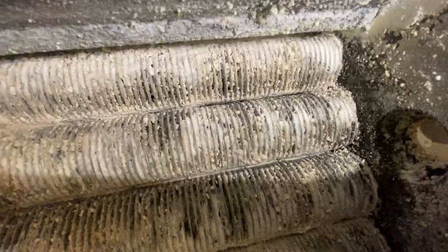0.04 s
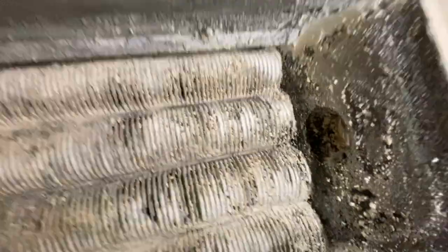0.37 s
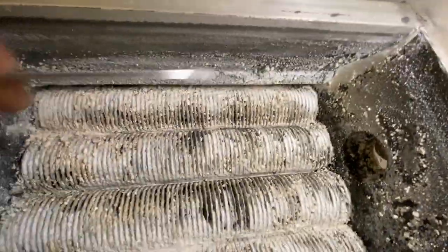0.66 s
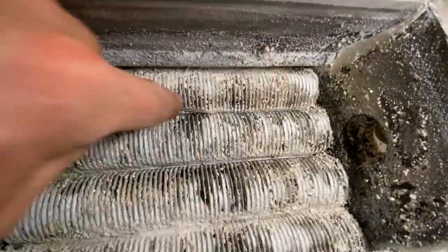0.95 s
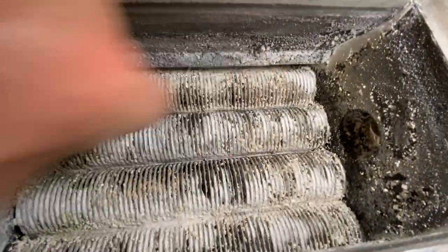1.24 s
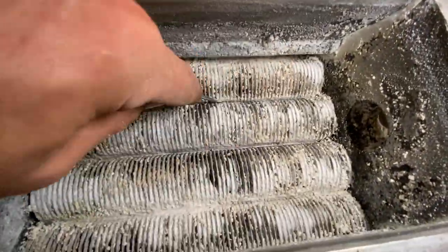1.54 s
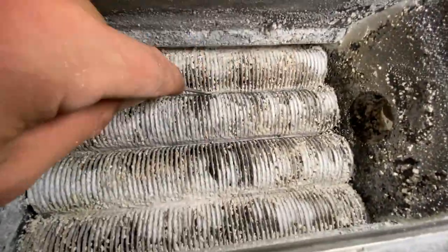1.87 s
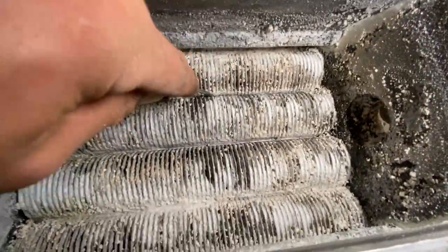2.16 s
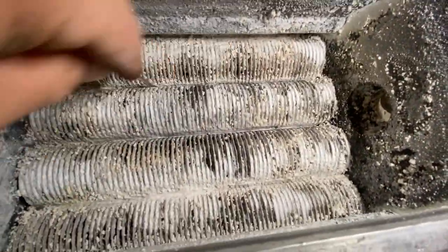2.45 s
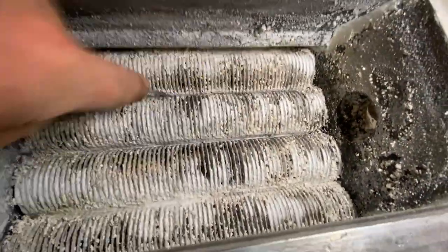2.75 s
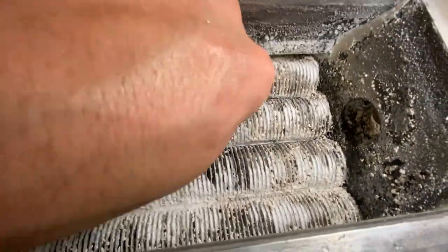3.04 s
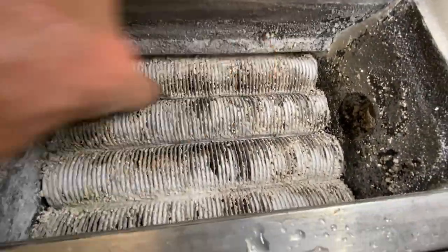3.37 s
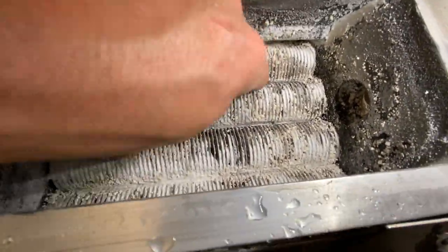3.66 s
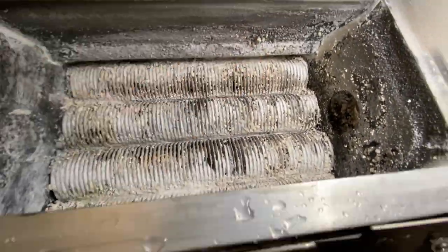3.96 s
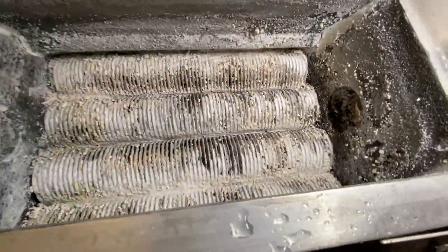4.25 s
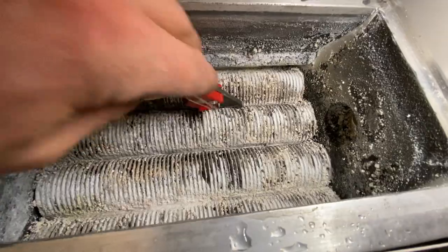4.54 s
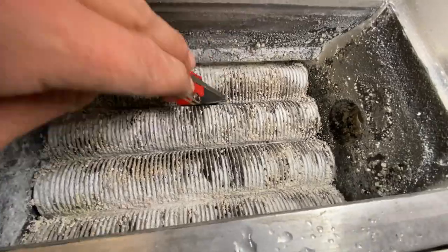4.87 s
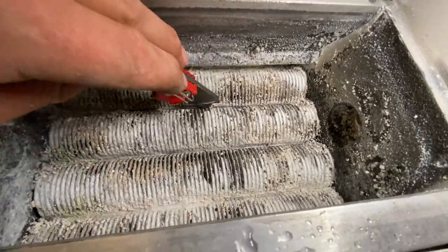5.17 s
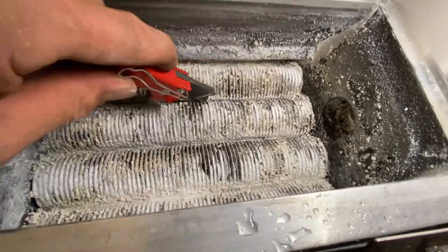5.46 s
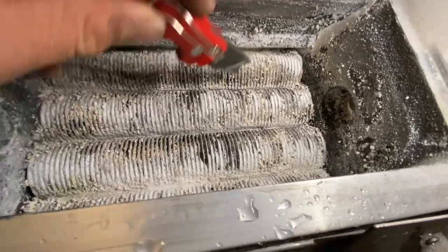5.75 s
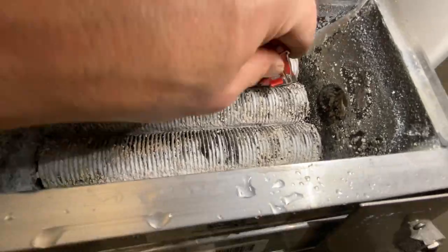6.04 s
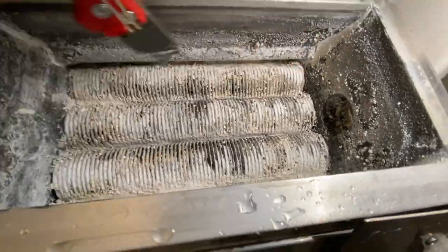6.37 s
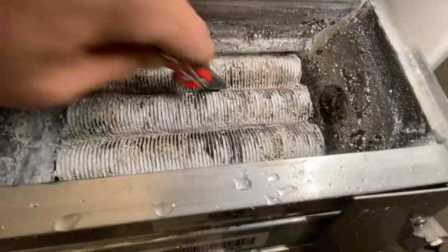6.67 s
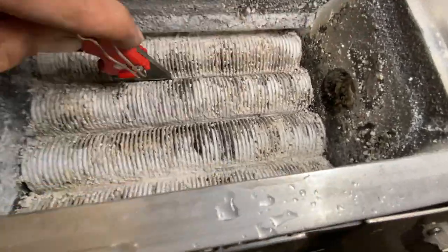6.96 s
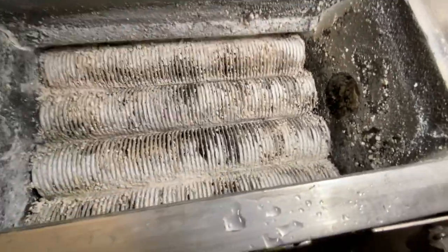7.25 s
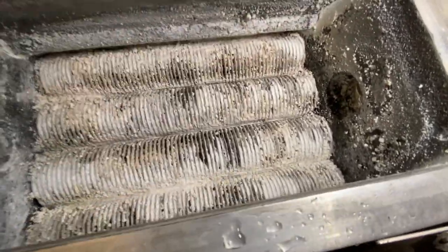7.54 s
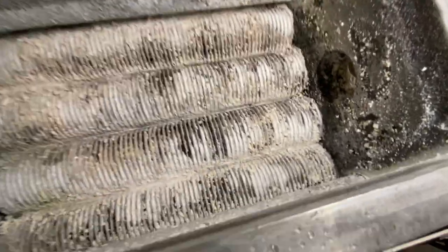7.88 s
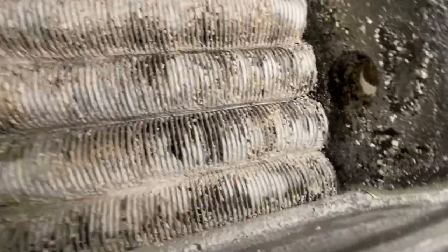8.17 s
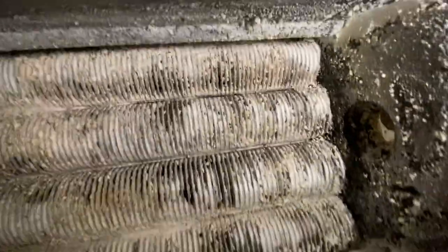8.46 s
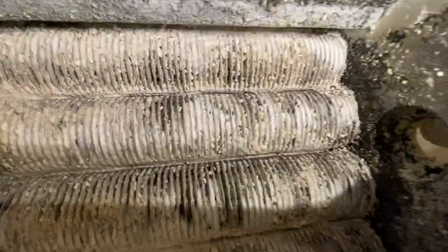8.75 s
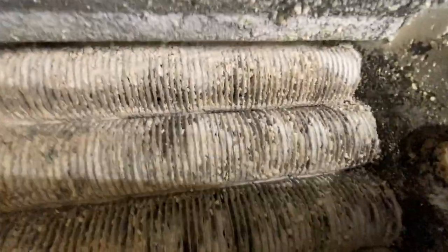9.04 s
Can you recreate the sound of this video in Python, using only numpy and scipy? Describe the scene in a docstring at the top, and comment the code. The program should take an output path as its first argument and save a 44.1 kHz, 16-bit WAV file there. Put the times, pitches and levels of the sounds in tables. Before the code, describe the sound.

A steel pin, then a knife, scrapes and snaps gritty crust from metal coils close up, followed by hollow knocks on the microphone.

```python
"""A boiler being descaled in a small room, heard close up on a hand-held stereo microphone.
First the grip rubs and creaks on the microphone case. From about 1 s a steel pin, then from 4 s a knife,
scrapes crust from between the coils: crushed grains ring in the tool and in the steel chamber, hard
crumbs snap and the coils thud. After 7 s the tool is put away, the hand knocks the case and metal
clinks lightly. A faint background hiss sinks after loud scraping and rises again in the pauses."""
import sys
import numpy as np
from scipy import signal
from scipy.fft import rfft, irfft, next_fast_len
from scipy.io import wavfile

SR = 44100
rng = np.random.default_rng(int(sys.argv[2]) if len(sys.argv) > 2 else 0)


def master_out(mix):
    """Clip the mix to full scale and print it as 16-bit PCM to the path in sys.argv[1]."""
    frames = np.transpose(np.atleast_2d(mix))
    ceiling = np.clip(frames, -1, 1)
    pcm = np.round(ceiling * 32767).astype(np.int16)
    wavfile.write(sys.argv[1], SR, pcm)


N = 401751
TIME = np.arange(N) / SR

# strokes of each tool: t/s, length/s, chamber level/dB, tip level/dB, slide-in/s
PIN_STROKES = [(.94, 0.12, -30, -39, 0.016), (1.142, 0.031, -41.5, -48.5, 0.013),
               (1.266, 0.052, -34, -34, 0.0067), (1.766, 0.041, -36, -42.5, 0.0018),
               (1.85, 0.052, -54, -56, 0.01), (2.293, 0.0076, -27, -35, 0.0086),
               (2.44, 0.066, -32, -41, 0.018), (2.594, 0.058, -26, -35, 0.009),
               (2.754, 0.048, -27, -32.5, 0.016), (3.093, 0.087, -28.5, -34, .002),
               (3.4, .044, -27.5, -32, 0.055), (3.598, 0.027, -43.5, -43.5, .004),
               (3.745, 0.073, -28.5, -39.5, 0.038), (3.84, 0.042, -32, -38, 0.0096)]
KNIFE_STROKES = [(4.617, 0.039, -35.5, -38, 0.017), (4.796, 0.15, -55.5, -63.5, 0.0066),
                 (6.106, 0.036, -33, -30.5, 0.024), (6.187, 0.013, -26.5, -42.5, 0.027),
                 (6.345, 0.03, -44, -55.5, 0.026), (6.62, 0.017, -37, -27, .006),
                 (6.693, .007, -31, -23, .005), (6.725, 0.015, -38.5, -57, 0.0094)]
# knocks on the microphone case: t/s, hollow level/dB, scuff level/dB, thump level/dB
CASE_KNOCKS = [(7.3395, -10, -23.5, -22.5), (7.556, -7, -22, -29.5), (7.593, -15.5, -43, -38),
               (7.659, -23, -27.5, -43.5), (7.697, -40, -18.5, -39), (7.803, -25, -46, -32.5)]
# handling noise at the microphone: t/s, rumble level/dB, rustle level/dB
HANDLING = [(0, -46, -55), (.4, -63, -61), (1.2, -51, -56), (1.55, -66.5, -63.5), (1.95, -60.5, -67.5),
            (2.3, -52, -55), (2.95, -59, -62.5), (3.3, -63, -58), (4.4, -66, -71), (4.8, -63, -62),
            (5.1, -61.5, -66), (5.6, -57.5, -63.5), (6.85, -61, -56.5), (7.1, -66.5, -65.5),
            (7.5, -44, -52), (7.95, -52, -50), (8.5, -62, -62.5), (9.11, -54.5, -81.5)]
# resonances that colour creaks and clinks: f/Hz, width/Hz, level/dB
CONTACT_MODES = [(547, 690, -3.5), (1208, 79, 6), (1486, 110, 3), (2154, 190, 4.5), (2870, 660, -1.5),
                 (4090, 730, -4), (5220, 150, 2), (7220, 400, -8), (8340, 810, -13.5), (11300, 680, -36.5)]


def scraping():
    """Crushed crust drives the steel chamber, heard by reflection, and the tool tip, heard directly."""
    # resonances of the chamber under each tool, and of the thin blade: f/Hz, width/Hz, level/dB
    pin_modes = [(190, 110, -6), (440, 180, -7), (821, 93, -2), (1265, 79, 0.5), (1574, 92, 1.5),
                 (1824, 36, 3), (2130, 296, -1.5), (2617, 290, -2.5), (2740, 170, 1.5), (3236, 200, -4.5),
                 (3630, 166, -2.5), (4450, 1600, -10.5), (5520, 270, -4), (6270, 700, -12.5),
                 (8040, 1900, -15.5)]
    knife_modes = [(190, 160, -4.5), (468, 360, 1), (824, 51, 8.5), (1268, 87, 12), (1583, 136, 7.5),
                   (1877, 130, 4.5), (2240, 220, 4), (3006, 500, 3.5), (3770, 280, 5), (4310, 790, -1.5),
                   (5050, 890, 2.5), (5940, 1600, -0.5), (8000, 880, -34)]
    blade_modes = [(4700, 450, -5), (5630, 400, -6.5), (6270, 550, -9.5)]
    # treble spectrum of each tip on the crust: f/Hz, level/dB
    pin_tip = [(8500, -7), (9800, -4), (11000, -1), (12500, 0), (14500, 0), (16000, -1)]
    knife_tip = [(8500, -3), (9200, -8.5), (10400, -6), (12000, -9.5), (13800, -9.5), (16000, -15)]
    # the tip catches on a rib or snaps a hard crumb: t/s, chamber level/dB, tip level/dB
    snags = [(.835, -41.5, -45), (1.04, -25, -21.5), (1.157, -30.5, -33.5), (1.272, -60, -30),
             (1.399, -42, -34.5), (1.877, -48, -40), (2.122, -30, -43), (2.464, -30.5, -20.5),
             (2.716, -40.5, -58), (3.048, -41.5, -40), (3.132, -27, -38), (3.17, -30, -32),
             (3.43, -25.5, -33), (3.603, -43.5, -33), (3.636, -68.5, -34), (4.15, -45, -45),
             (4.195, -44, -38.5), (4.48, -40, -51), (4.564, -48, -61), (4.724, -38, -38.5),
             (4.965, -46.5, -45), (5.011, -54, -48), (5.502, -53, -74), (5.62, -41, -42),
             (5.677, -28.5, -40), (5.737, -36.5, -48), (5.768, -37, -33.5), (6.066, -40.5, -36.5),
             (6.162, -29.5, -16), (6.571, -42, -48.5), (6.722, -26, -24.5), (6.836, -32.5, -59),
             (6.95, -40, -57), (7.023, -43, -39), (8.245, -48.5, -53)]
    pin_taken_s, knife_taken_s, knife_away_s = 0.8, 4.1, 7.05
    fracture = grains(per_s=16000, spread_db=1.5, clump_db=1, clumps_per_s=900)
    snaps = grains(per_s=64, spread_db=7, clump_db=13.5, clumps_per_s=40)
    # loose crumbs trickle as the hand moves, louder while a tool is at work
    crumbs = curve(HANDLING, column=2) * grains(per_s=380, spread_db=3.5, clump_db=10, clumps_per_s=22)
    crumbs *= from_db(np.where((TIME > pin_taken_s) & (TIME < knife_away_s), 0, -14))
    tools = [(PIN_STROKES, pin_modes, pin_tip, TIME <= knife_taken_s),
             (KNIFE_STROKES, knife_modes, knife_tip, TIME > knife_taken_s)]
    chamber, tip = 0, 0
    for strokes, modes, colour, held in tools:
        slide_in_s = np.array(strokes)[:, 4]
        crush = pressure(strokes, 2, slide_in_s, bite_db=-0.5, crest=0.46, ease_db=-6, release_s=0.027)
        crust = grains(per_s=9000, spread_db=1.5, clump_db=4.5, clumps_per_s=340)
        cracks = bites(strokes, column=2, gain_db=1) + held * from_db(4) * ticks(snags, column=1)
        drive = crush * (crust + from_db(-10) * snaps) + fracture * cracks
        drive += held * from_db(-1.5) * crumbs
        chamber += body(scatter(drive, fall_s=0.00082, wet_db=5.5), modes, sway_db=4.5)

        crumble = pressure(strokes, 3, slide_in_s, bite_db=-3.5, crest=0.62, ease_db=-2, release_s=0.023)
        grit = from_db(2) * grains(per_s=2900, spread_db=-7.5, clump_db=3.5, clumps_per_s=310)
        cracks = bites(strokes, column=3, gain_db=9) + held * from_db(-3) * ticks(snags, column=2)
        tip_drive = crumble * (grit + from_db(-14.5) * snaps) + fracture * cracks
        tip_drive += held * from_db(-12) * crumbs
        tip += tip_pings(tip_drive, colour, width_hz=340)
        if strokes is KNIFE_STROKES:  # the blade sings as it snicks through
            chamber += from_db(-7.5) * body(scatter(tip_drive, fall_s=0.0006, wet_db=24), blade_modes)
    return chamber + reflect(at_ports(tip), t60=0.02, wet_db=-13, cut_hz=17000)


def pressure(strokes, column, attack_s, bite_db, crest, ease_db, release_s):
    """A stroke slides in, bites, peaks at the fraction `crest` of its length, eases and lets go."""
    power = np.zeros(N)
    for row, lead in zip(strokes, np.broadcast_to(attack_s, len(strokes))):
        start, end = row[0], row[0] + row[1]
        corners_s = [start - lead, start, start + crest * (end - start), end, end + release_s]
        span = slice(max(0, int(corners_s[0] * SR)), int(corners_s[-1] * SR))
        shape_db = np.interp(TIME[span], corners_s, [-25, bite_db, 3, ease_db, -30])
        power[span] += from_db(row[column] + shape_db) ** 2
    return np.sqrt(power)


def grains(per_s, spread_db, clump_db, clumps_per_s):
    """Random fractures of uneven size, clumped as the edge sticks and slips."""
    size_db = spread_db * np.minimum(rng.exponential(1, N), 4)
    size_db += clump_db * np.tanh(drift(clumps_per_s))
    return rms_one(from_db(size_db) * rng.choice([-1, 1], N) * (rng.random(N) < per_s / SR))


def bites(strokes, column, gain_db):
    """Envelope of the crack as the edge digs in at the start of each stroke."""
    return from_db(gain_db) * bursts(strokes, column, fall_s=0.0035)


def ticks(rows, column, rise_s=0.0032):
    """Envelope of the ticks: the tip loads quickly, then the crumb gives way."""
    backwards = clicks(rows, column)[::-1]
    loading = signal.lfilter([0, 1], [1, -np.exp(-1 / (rise_s * SR))], backwards)[::-1]
    return loading + bursts(rows, column, fall_s=0.005)


def tip_pings(drive, colour, width_hz):
    """Each fracture pings at a treble pitch of its own; the favoured pitches change as the tip moves."""
    pitches = np.geomspace(colour[0][0], colour[-1][0], num=9)
    gains = rms_one(from_db(at_hz(colour, pitches)))
    chosen = np.repeat(rng.integers(0, len(pitches), N // 24 + 1), 24)[:N]  # one pitch per 24 samples
    pings = 0
    for k, (hz, gain) in enumerate(zip(pitches, gains)):
        sway = from_db(4 * np.tanh(drift(45)) - 1.5)
        pings += gain * sway * resonate(drive * (chosen == k), hz, width_hz)
    return pings / np.sqrt(np.pi * width_hz / SR)


def scatter(drive, fall_s, wet_db, left_lag_s=0.00045):
    """Each impulse scatters briefly; its direct sound reaches the nearer, right-hand port first."""
    decay = np.exp(-1 / (fall_s * SR))
    echo_power = signal.lfilter([1 - decay], [1, -decay], drive ** 2 + 1e-20)
    echo = np.sqrt(echo_power) * rng.standard_normal((2, N))
    direct = np.array([np.roll(drive, round(left_lag_s * SR)), drive])
    return (direct + from_db(wet_db) * echo) / np.sqrt(1 + from_db(wet_db) ** 2)


def at_ports(x):
    """The treble arrives in different phase at the microphone's two ports."""
    # phase turns between the ports: f/Hz, width/Hz
    phase_turns = [(9200, 1200), (13150, 1300)]
    return np.array([x, allpass(x, phase_turns)])


def coil_thuds():
    """Each stroke shoves the coils in proportion to its force, and the hand bumps them."""
    # bumps of the hand: t/s, level/dB
    bumps = [(.113, -34), (1.209, -32), (2.535, -33.5), (5.265, -41.5), (5.675, -36), (5.935, -37),
             (6.123, -29.5), (6.195, -29), (6.946, -38)]
    shoves = from_db(-10.5) * clicks(PIN_STROKES + KNIFE_STROKES, column=2, delay_s=0.004)
    return boom(shoves + from_db(-5) * clicks(bumps, column=1), sag_hz=62, sag_width_hz=140)


def boom(blows, sag_hz, sag_width_hz):
    """A deep, soft thump whose lowest part arrives last."""
    # deep modes set off by a shove: f/Hz, level/dB, t60/s
    deep_modes = [(72.5, -0.5, 0.27), (99.7, 5, 0.082), (165.3, -10.5, 0.12)]
    thump = passband(passband(ring(blows, deep_modes), 240, "low"), 62, "high")
    return allpass(thump, [(sag_hz, sag_width_hz)] * 3)


def case_knocks():
    """Padded knocks ring the microphone case near the left port; a deep thump follows the touch."""
    # each knock touches, then lands: delay/s, level/dB
    contacts = [(0, -5), (.013, 2)]
    # ringing of the case: f/Hz, level/dB, t60/s
    knock_modes = [(157.6, -17.5, 0.33), (283, -16, 0.41), (316, -33.5, 0.11), (331, -2.5, 0.17),
                   (354.6, -3, 0.15), (415, -4, 0.1), (535, -23.5, 0.33), (658, -12, 0.15),
                   (793, -9.5, 0.18)]
    blows = sum(from_db(db) * clicks(CASE_KNOCKS, column=1, delay_s=delay) for delay, db in contacts)
    hollow = from_db(-1.5) * passband(passband(ring(blows, knock_modes), 370, "low"), 171, "high")
    thump = boom(clicks(CASE_KNOCKS, column=3, delay_s=0.0104), sag_hz=69.5, sag_width_hz=108)
    return hollow * pan(left_db=8.5) + thump * pan(left_db=2.5)


def case_rubs():
    """The sliding hand sounds the hollow case; skin scuffs its shell at each rub and knock."""
    # slides of the hand: t/s, length/s, hollow level/dB, scuff level/dB
    rubs = [(.05, 0.043, -35.5, -41.5), (.108, 0.022, -24.5, -28.5), (.722, 0.0059, -62, -43.5),
            (2.235, 0.018, -61, -46), (3.2, 0.044, -67, -56), (3.965, 0.023, -58, -49),
            (4.075, 0.022, -49, -63), (4.15, 0.07, -42.5, -46), (4.293, 0.015, -38.5, -53),
            (5.21, 0.065, -64, -51.5), (5.832, 0.0099, -47, -45.5), (5.927, 0.016, -42, -30),
            (6.772, 0.049, -69, -39), (7.66, 0.14, -34, -67), (8.27, 0.07, -58.5, -73.5),
            (8.64, 0.039, -55.5, -79.5)]
    # resonances of the hollow case: f/Hz, width/Hz, level/dB
    case_modes = [(145, 100, -14), (245, 23, -3.5), (309, 110, 0), (400, 46, 1), (459, 32, -0.5)]
    # spectrum of skin on the shell: f/Hz, level/dB
    scuff_colour = [(250, -4), (500, 5.5), (800, 7.5), (1300, 1.5), (1700, -9.5), (2200, -5.5),
                    (3500, -12.5), (7000, -18), (11000, -30.5), (15000, -45.5)]
    slide = pressure(rubs, 2, attack_s=0.012, bite_db=3, crest=0.87, ease_db=-8.5, release_s=0.017)
    friction = slide * grains(per_s=1500, spread_db=1, clump_db=-2, clumps_per_s=90)
    hollow = from_db(5) * passband(body(friction, case_modes), 416, "low")
    drag = pressure(rubs, 3, attack_s=0.017, bite_db=0, crest=0.12, ease_db=7, release_s=0.013)
    touch = from_db(-7) * drag + bursts(CASE_KNOCKS, column=2, fall_s=0.022)
    scuff = touch * from_db(0.4 * drift(300)) * stereo_noise(scuff_colour, alike=0.082)
    return hollow * pan(left_db=8.5) + scuff * pan(left_db=0.5)


def grip_creaks():
    """The grip sticks and slips on the shell, right at the microphone."""
    # creaks: t/s, length/s, level/dB
    creaks = [(.253, 0.0071, -28.5), (.464, 0.0085, -29), (.486, 0.019, -22.5), (.636, 0.0068, -28),
              (2.199, 0.0096, -38)]
    grip = pressure(creaks, 2, attack_s=0.018, bite_db=1, crest=0.52, ease_db=-2, release_s=0.015)
    slips = grip * grains(per_s=4500, spread_db=4.5, clump_db=0, clumps_per_s=350)
    return body(scatter(slips, fall_s=0.001, wet_db=5.5), CONTACT_MODES, sway_db=1)


def clinks():
    """A short rough contact, then the metal rings on."""
    # light touches of metal: t/s, level/dB
    touches = [(.494, -37.5), (2.072, -55.5), (7.992, -36.5), (8.113, -49), (8.438, -55.5)]
    # ringing of the metal: f/Hz, level/dB, t60/s
    metal_modes = [(1292, -6, 0.2), (1330, -7.5, 0.11), (1426, -10, 0.076), (2159, -14, 0.15),
                   (3060, -15, 0.072), (5380, -8, 0.061), (5480, -16, 0.051)]
    roughness = grains(per_s=2800, spread_db=8.5, clump_db=14.5, clumps_per_s=300)
    contact = bursts(touches, column=1, fall_s=0.013) * roughness
    scratch = body(scatter(contact, fall_s=0.00033, wet_db=2.5), CONTACT_MODES)
    return from_db(9) * (scratch + ring(clicks(touches, column=1), metal_modes))


def background():
    """Rumble and rustle of the hand over a faint hiss; all three dip briefly at 7.16 s."""
    # background hiss sinks after loud scraping and rises again in the pauses: t/s, level/dB
    hiss_levels = [(0, -63.5), (.8, -60), (1.55, -71.5), (2.2, -61.5), (4.05, -69.5), (4.6, -67.5),
                   (5.9, -58), (7.1, -65), (7.22, -59), (9.11, -56.5)]
    # spectra of the three noises: f/Hz, level/dB
    rumble_colour = [(20, -24), (40, -4), (62, 3.5), (115, -6), (175, -13), (330, -10.5), (550, -31),
                     (1200, -71.5)]
    rustle_colour = [(200, -8.5), (400, 8.5), (600, -3.5), (830, 5.5), (1020, -2), (1270, 3), (1750, -5.5),
                     (2200, -10), (3500, -16), (8000, -26), (16000, -53)]
    hiss_colour = [(300, 0.5), (1500, 3), (2800, -2), (4300, 2.5), (5800, -3.5), (8000, -13.5),
                   (11000, -23), (13000, -30.5), (16000, -42)]
    rumble = curve(HANDLING, 1) * from_db(4 * drift(29)) * stereo_noise(rumble_colour, alike=0.78)
    rustle = curve(HANDLING, 2) * from_db(6 * drift(25)) * stereo_noise(rustle_colour, alike=0.05)
    hiss = curve(hiss_levels, 1) * from_db(1 + 1.6 * drift(25)) * stereo_noise(hiss_colour, alike=0.05)
    dip = from_db(-23 * np.exp(-((TIME - 7.16) / 0.017) ** 2))
    return (rumble * pan(left_db=2.5) + rustle + hiss) * dip


def stereo_noise(colour, alike):
    """Noise of a given spectrum and left-right correlation."""
    hz = np.linspace(1, SR / 2, next_fast_len(N) // 2 + 2)
    white = rng.standard_normal((2, 2 * len(hz) - 2))
    mid, side = irfft(rfft(white) * from_db(at_hz(colour, hz)))[:, :N]
    return rms_one(np.sqrt(1 + alike) * mid + np.sqrt(1 - alike) * side * [[1], [-1]])


def reflect(x, t60, wet_db, cut_hz):
    """Dense reflections, different at each microphone port, join the direct sound."""
    t = TIME[:SR // 2]
    tail = passband(rng.standard_normal((2, len(t))), cut_hz, "low") * from_db(-60 * t / t60)
    tail *= from_db(wet_db) * np.sqrt(2 * cut_hz / SR / np.sum(tail ** 2, axis=1, keepdims=True))
    return (x + signal.fftconvolve(x, tail, axes=1)[:, :N]) / np.sqrt(1 + from_db(2 * wet_db))


def body(x, modes, sway_db=0):
    """Parallel resonances; with sway, each swells and fades by itself as the contact wanders."""
    power = sum(from_db(db) ** 2 * np.pi * width / SR for _, width, db in modes)
    out = 0
    for k, (hz, width, db) in enumerate(modes):
        swell_db = sway_db * np.tanh(drift(14)) if sway_db else 0
        out += (-1) ** k * from_db(db + swell_db) * resonate(x, hz, width)
    return out / np.sqrt(power)


def ring(blows, modes):
    """Every blow sets decaying sines going."""
    out = 0
    for hz, db, t60 in modes:
        a = poles(hz, np.log(1000) / (np.pi * t60))
        out += from_db(db) * signal.lfilter([0, np.sin(2 * np.pi * hz / SR)], a, blows + 1e-18)
    return out


def resonate(x, hz, width_hz):
    """One resonance with gain 1 at its peak."""
    a = poles(hz, width_hz)
    return signal.lfilter((1 - a[2]) / 2 * np.array([1, 0, -1]), a, x + 1e-18)


def allpass(x, bands):
    """Delay each band without changing its level."""
    for hz, width in bands:
        a = poles(hz, width)
        x = signal.lfilter(a[::-1], a, x)
    return x


def poles(hz, width_hz):
    """Denominator of one resonance."""
    r = np.exp(-np.pi * width_hz / SR)
    return np.array([1, -2 * r * np.cos(2 * np.pi * hz / SR), r * r])


def passband(x, edge_hz, kind):
    """Second-order low-pass or high-pass."""
    return signal.sosfilt(signal.butter(2, edge_hz, kind, fs=SR, output="sos"), x)


def clicks(rows, column, delay_s=0):
    """One impulse for each row."""
    rows, out = np.array(rows), np.zeros(N)
    out[((rows[:, 0] + delay_s) * SR).astype(int)] = from_db(rows[:, column])
    return out


def bursts(rows, column, fall_s):
    """An envelope that jumps at each row and dies away."""
    return signal.lfilter([1], [1, -np.exp(-1 / (fall_s * SR))], clicks(rows, column))


def curve(rows, column):
    """Gain in time from a column in dB."""
    return from_db(np.interp(TIME, np.array(rows)[:, 0], np.array(rows)[:, column]))


def at_hz(points, hz):
    """Level of a spectrum, joined on a log axis."""
    return np.interp(np.log(hz), np.log(np.array(points)[:, 0]), np.array(points)[:, 1])


def drift(per_s):
    """Random wander of unit power."""
    return rms_one(np.interp(TIME * per_s, np.arange(N // 8), rng.standard_normal(N // 8)))


def pan(left_db):
    """Left and right gains."""
    return from_db([[left_db / 2], [-left_db / 2]])


def rms_one(x):
    """Scale to unit power."""
    return x / np.sqrt(np.mean(x ** 2) + 1e-20)


def from_db(db):
    """Decibels to gain."""
    return 10 ** (np.asarray(db) / 20)


def scene():
    """Work on the boiler and the hand on the microphone, both close, in a small room over faint hiss."""
    work = reflect(scraping() + coil_thuds(), t60=0.19, wet_db=-23.5, cut_hz=4300)
    handling = case_knocks() + case_rubs() + grip_creaks() + clinks()
    return work + reflect(handling, t60=0.43, wet_db=-17, cut_hz=2900) + background()


def record(dry):
    """The top is cut steeply above 15.9 kHz."""
    return signal.sosfilt(signal.ellip(10, 0.2, 80, 15900, fs=SR, output="sos"), dry)


dry = scene()
out = record(dry)
master_out(out)
```